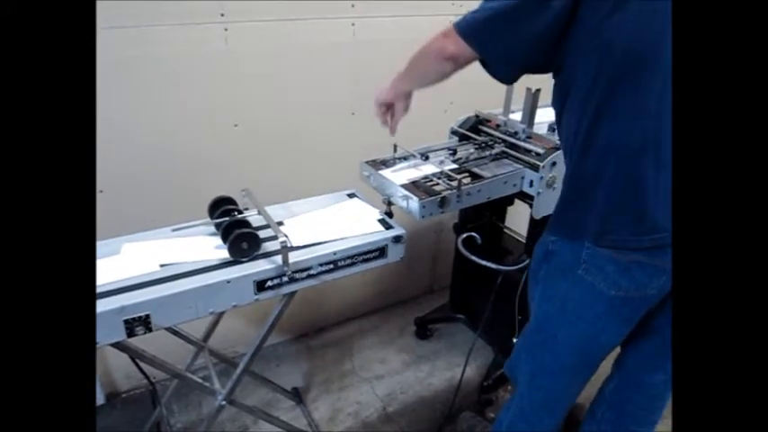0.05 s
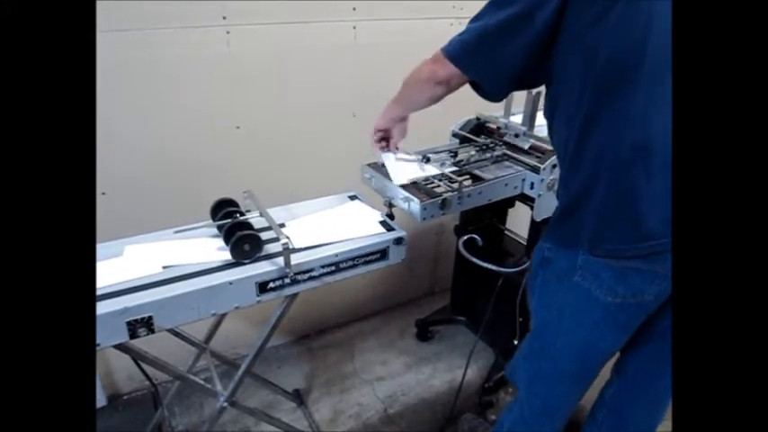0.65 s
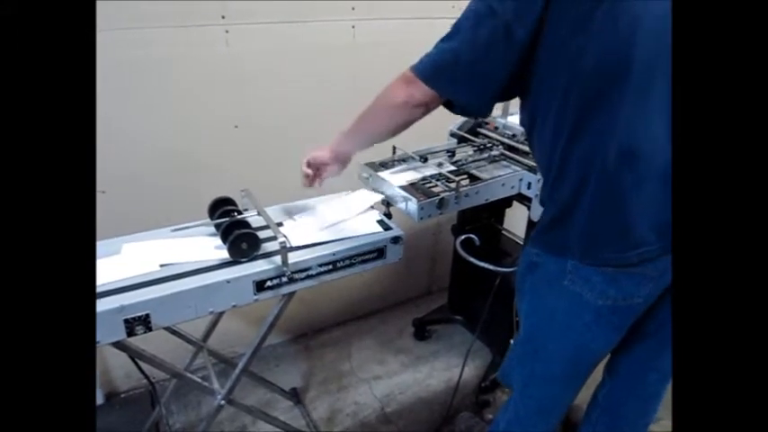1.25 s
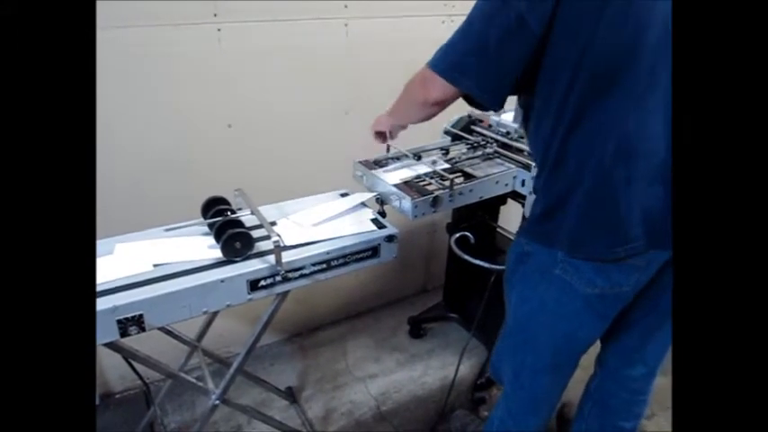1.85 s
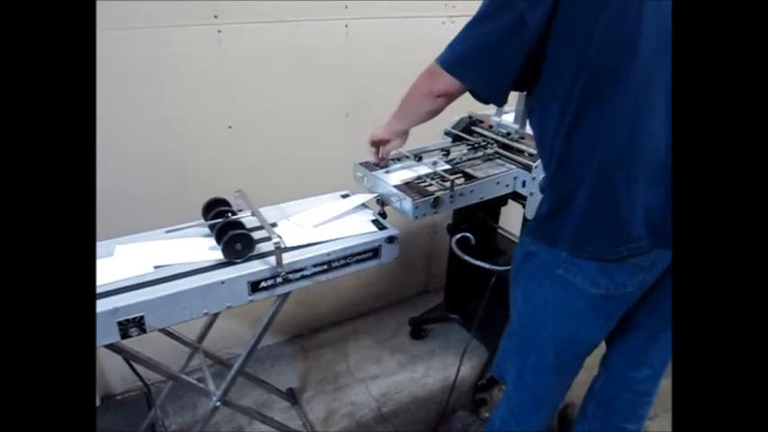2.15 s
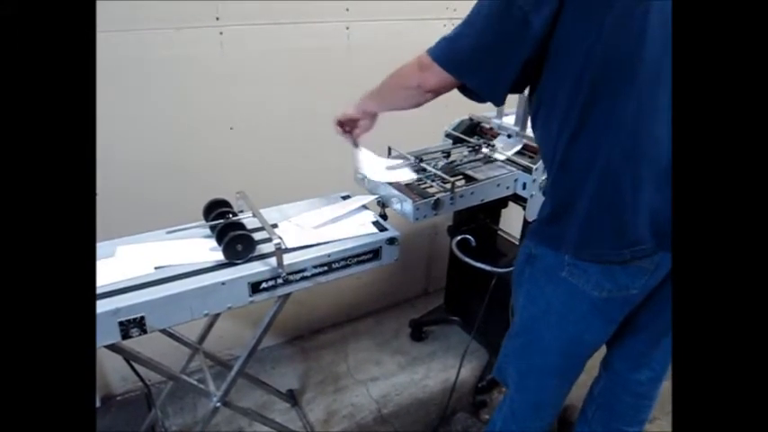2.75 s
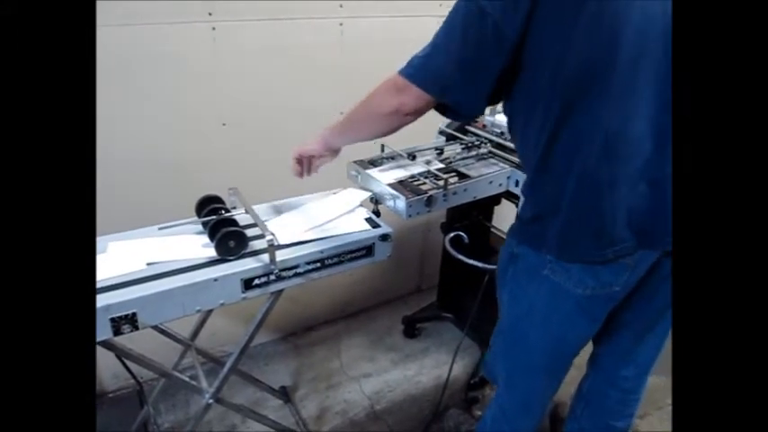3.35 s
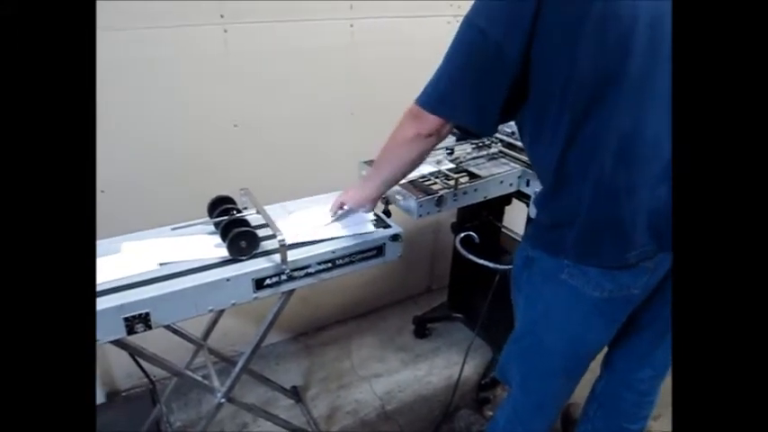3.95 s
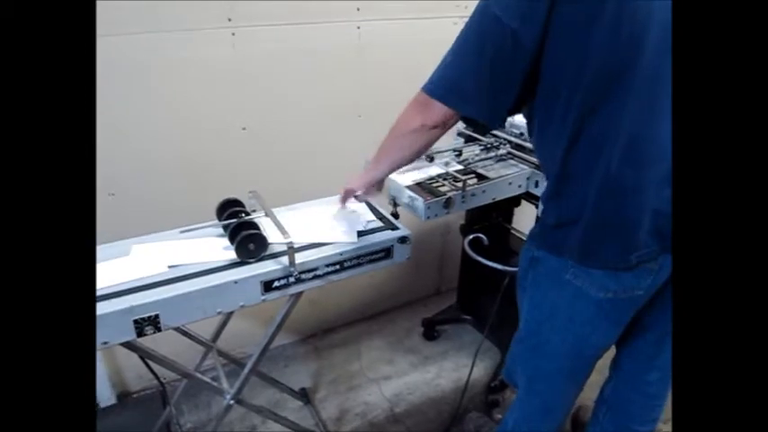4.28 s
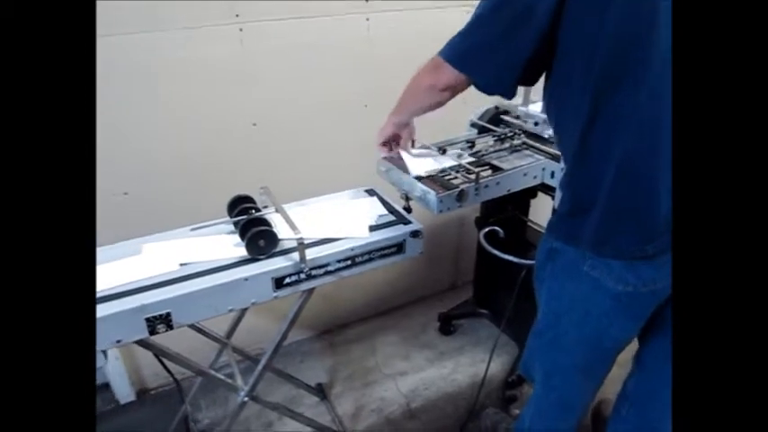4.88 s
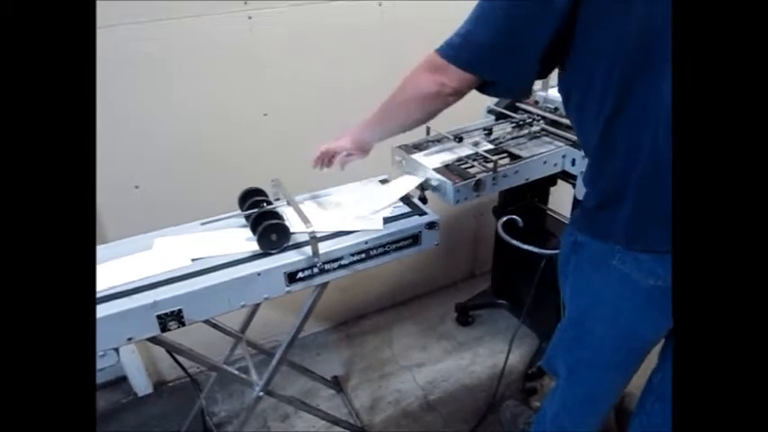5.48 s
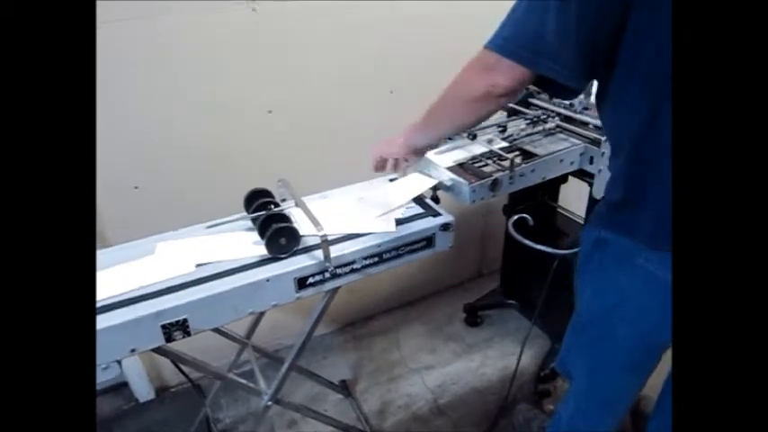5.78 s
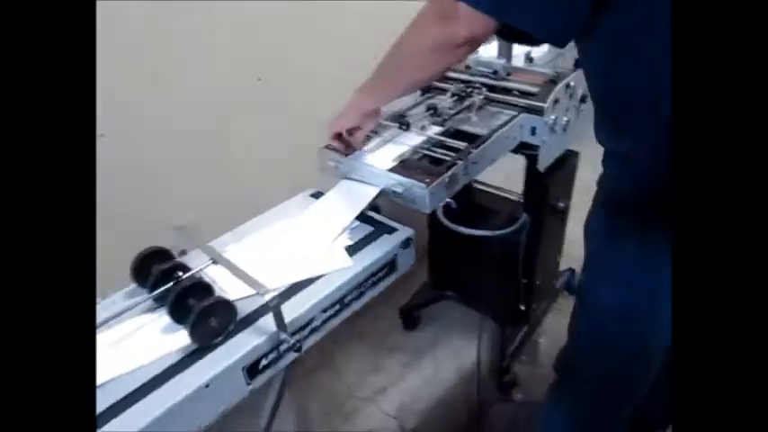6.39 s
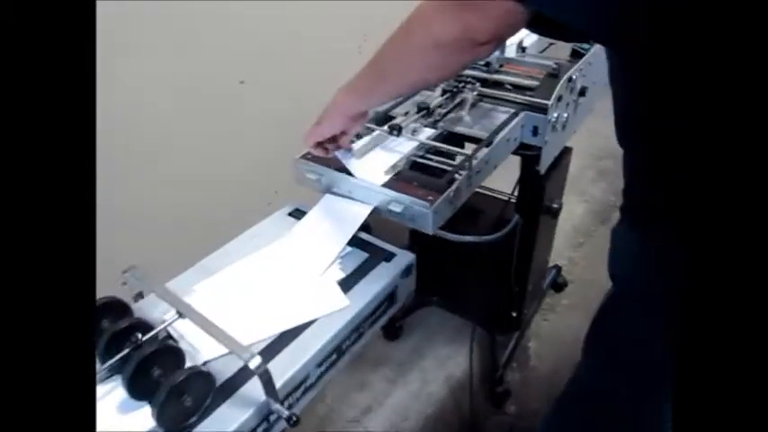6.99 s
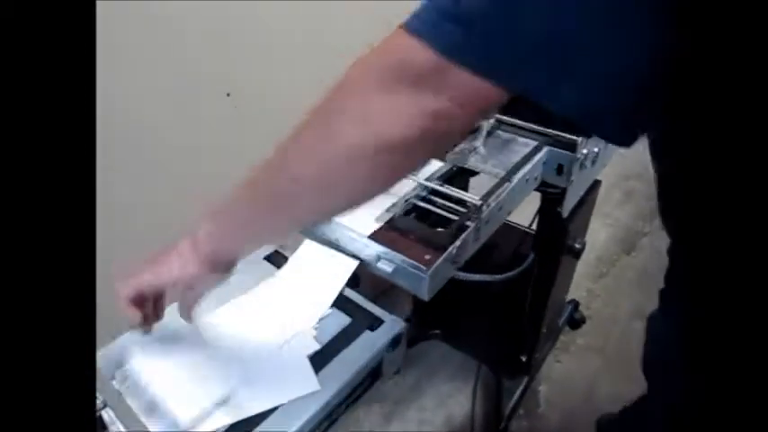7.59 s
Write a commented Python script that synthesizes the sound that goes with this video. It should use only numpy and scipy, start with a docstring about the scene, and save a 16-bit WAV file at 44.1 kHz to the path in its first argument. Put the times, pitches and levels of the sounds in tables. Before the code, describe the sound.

Four metallic clacks, each followed by crackling paper and a latch tick, cut through the loud hum and hiss of a feeder machine.

```python
"""An envelope feeder pulls four sheets, one by one, over the hum and hiss of its vacuum pump. On each feed a
clutch clacks, the rollers whirr, the sheet rustles, pops and lands, and a latch ticks shut. The warehouse adds
a thin tail. Late on, the microphone moves in. Its gain control ducks at every clack and creeps back, so the
steady hum seems to drop and swell."""
import sys
import numpy as np
from scipy import signal
from scipy.fft import rfft, irfft, next_fast_len
from scipy.io import wavfile
from scipy.ndimage import minimum_filter1d

SR = 44100
rng = np.random.default_rng(int(sys.argv[2]) if len(sys.argv) > 2 else 0)


def log_audio(samples):
    """Write samples as a 16-bit WAV file to the path given in sys.argv[1]."""
    # one column per channel
    frames = np.atleast_2d(samples).T
    # limit to full scale, then quantise
    limited = np.clip(frames, -1, 1)
    pcm = np.round(limited * 32767).astype(np.int16)
    wavfile.write(sys.argv[1], SR, pcm)


N = 340893
T = np.arange(N) / SR
FFT_SIZE = next_fast_len(N + 8192, True)
HZ = np.fft.rfftfreq(FFT_SIZE, 1 / SR)
MAINS_HZ, SHAFT_HZ = 60, 28.993

# one clutch clack a sheet (time [s], level [dB], second strike's delay [s], its relative level [dB],
# sheet rub level [dB], roller whirr level [dB])
FEEDS = [(0.6084, 8.5, 0.003, -5, 0.5, -22.5), (2.5988, 10.5, 0.0019, -1.5, -.5, -23),
         (4.9071, 7, 0.0026, -3, -.5, -24), (7.0764, 4, 0.0046, -4, -1.5, -42)]
# ring of the clutch metal (frequency [Hz], width [Hz], boost at full ring [dB])
METAL_MODES = [(1854, 110, 22), (3340, 150, 9), (3820, 100, 17), (4690, 40, 22), (5370, 430, 16),
               (7200, 140, 14), (10600, 350, 13)]
# body of the clutch metal (frequency [Hz], level [dB])
METAL_EQ = [(100, -22), (900, -4.5), (1700, -3), (3200, 2.5), (5500, -2), (7500, -3.5), (10500, -4),
            (15500, -6.5)]
# sheet stop and latch at the end of each feed (time [s], level [dB])
LATCH_TICKS = [(1.167, 2), (1.248, -7), (3.163, 1), (3.234, -5), (5.4625, 0.5), (5.5314, -4.5), (7.637, 0),
               (7.7055, -3.5)]
# swells as a sheet peels off, bends into the rollers, slips out and settles on the conveyor
# (time after the clack [s], rise [s], fall [s], flutter level [dB], rustle level [dB])
SHEET_SWELLS = [(0.135, 0.065, 0.064, -24, -6), (0.21, .03, 0.034, -11.5, -16),
                (0.517, 0.026, 0.04, -22, -7.5), (0.559, 0.037, 0.12, -11.5, -17)]
# the sheet buckles as it leaves the stack (time [s], pop level [dB], crack level [dB])
BUCKLES = [(0.7788, -11.5, -6), (0.802, -11, -3), (2.7135, -24, -7), (2.7747, -8, -4.5), (5.0826, -7, -0.5),
           (5.1049, -15, -4.5), (7.1837, -15, -7.5), (7.247, -6.5, -2), (7.282, -9, -11)]
# its tail slaps down twice (time after the clack [s], level [dB])
TAIL_SLAPS = [(0.503, -5.5), (0.538, -3.5)]
# paper colours: low flutter, bright rustle, hollow pop, sharp crack (frequency [Hz], level [dB])
FLUTTER_EQ = [(50, -36), (170, -3.5), (250, 5.5), (370, -1.5), (600, 1.5), (1000, -0.5), (1700, -4.5),
              (2600, -2.5), (5000, -29)]
RUSTLE_EQ = [(600, -15), (1500, -5.5), (2200, -2), (3100, 3), (4500, -1.5), (6300, -2), (7500, -9.5),
             (10500, -8), (15500, -18.5)]
POP_EQ = [(100, -14), (300, -10), (600, 7), (850, -8), (1300, -6), (4000, -32)]
CRACK_EQ = [(300, -12), (1100, 2.5), (2200, 6), (3300, 5), (5500, -8), (10000, -22), (15500, -24)]
# the sheet's edge on the stack (time [s], length [s], centre [Hz], width [Hz], level [dB])
EDGE_SCRAPES = [(0.763, 0.092, 11000, 2960, -12.5), (2.705, 0.032, 5800, 2200, -9),
                (4.995, 0.036, 5800, 2500, -17), (5.097, 0.047, 11200, 1600, -20),
                (7.17, 0.053, 5500, 2600, -8), (7.57, .08, 11000, 4000, -16)]
# envelope of the roller squeak (time [s], gain [0-1])
SQUEAK_ENVELOPE = [(5.285, 0), (5.305, 1), (5.335, 1), (5.355, 0)]
# motor hum (harmonic [x mains], level [dB])
HUM_PARTIALS = [(1, -49.6), (2, -22.0), (4, -28.5), (6, -28.9), (7, -43.7), (8, -38.1), (10, -46.6)]
# beat of the four pump vanes (harmonic [x shaft speed], level [dB])
VANE_PARTIALS = [(2, -47.4), (4, -36.3), (8, -37.0), (12, -31.9), (15, -50.0), (16, -40.8), (20, -43.7),
                 (24, -40.2)]
# rotor whine (harmonic [x shaft speed], level [dB], left minus right [dB])
WHINE_PARTIALS = [(66, -12, -1), (72, -13, 1), (77, -8, -5), (80, -11, -6), (81, 0, -3), (82, -8, -2),
                  (84, -13, 0), (93, -10, 1), (97, -10, -4), (98, -13, -1), (100, -15, 6), (101, -13, 0),
                  (117, -14, 5), (200, -8, 6), (208, -14, 4), (210, -11, 2)]
# colour of the exhaust air (frequency [Hz], side level [dB], close level [dB])
AIR_EQ = [(25, -12, -15), (59, -2.5, 1), (130, -1.5, -2.5), (259, 2.2, 3), (555, -0.8, -4), (820, 1.6, 3),
          (1390, -5.5, -6), (2010, -0.5, 1.5), (3470, -4.5, -3.5), (5970, 0, 2.5), (8400, -7.5, -6.5),
          (9750, 2.5, 2), (12850, -3, -5.5), (16400, -14.5, -14)]
# air line resonances (frequency [Hz], width [Hz], side boost [dB], close boost [dB])
HOSE_MODES = [(58, 6, 9, 11), (2350, 90, 4, 8), (2905, 90, 6, 6), (5790, 60, 6, 0), (6130, 130, 3, 6),
              (9850, 120, 3, 3), (10125, 70, 4, 5), (10637, 14, 12, 2), (11550, 130, 8, 2)]
# thin whistles close to the pump (frequency [Hz], level [dB])
PUMP_WHISTLES = [(1884, -42), (2466, -40), (2492, -42), (2902, -36), (2928, -38), (6122, -38), (10126, -41)]
# drone of the conveyor drive (frequency [Hz], level [dB])
CONVEYOR_PARTIALS = [(177.3, -45), (265.6, -45), (436.5, -47), (506, -48), (852, -45)]
# the microphone moves from the pump's side to close in front (time [s], close share [0-1])
APPROACH = [(5.6, 0.18), (6.3, 0.7)]
# last, it leans over the feeder, away from the motor (time [s], share of the way [0-1])
LEAN_IN = [(6.4, 0.44), (7, 1)]
# it leaves the beam of the pipe note (time [s], level [dB])
PIPE_FADE = [(5.95, 0), (6.2, -10.5)]
# the hiss rises and falls as it moves (time [s], level [dB])
HISS_RIDE = [(4.7, -1), (5.3, -2.3), (5.9, -0.1), (6.7, 1.5), (7.4, -3)]
# likeness of the two microphone ports (frequency [Hz], coherence [0-1])
PORT_COHERENCE = [(40, .95), (130, .985), (290, .975), (640, .93), (1410, .78), (3100, .64), (6820, .48),
                  (15000, .36)]
# phase between the ports (frequency [Hz], left lead [rad])
PORT_PHASE = [(0, -0.045), (1700, -0.21), (4400, 0.1), (6800, -0.78), (10000, -0.91), (15000, -0.55)]
# balance between the ports (frequency [Hz], left minus right [dB])
PORT_BALANCE = [(300, 0), (700, 1), (1300, 0), (2400, -2.5), (3400, 0), (6000, 3), (7400, .5), (9800, -3.5),
                (11600, -3), (12500, 1), (15000, -1)]


def clutch(clack_t60=0.044, tick_t60=0.043, clack_ring=0.51, tick_ring=0.22, rebound_s=0.048):
    """A hard double strike starts each feed; latch and stop tick in the same metal, drier and duller."""
    strikes = []
    for time, db, delay, second_db, *_ in FEEDS:
        strikes += [(time, db), (time + delay, db + second_db)]
    body, ring = spectrum(METAL_EQ), resonances(METAL_MODES)
    clacks = colour(bursts(strikes, clack_t60), body + clack_ring * ring)
    tick_eq = body + tick_ring * ring
    treble_octaves = np.log2(np.maximum(HZ / 3000, 1))  # light blows lose their top end
    ticks = colour(bursts(LATCH_TICKS, tick_t60), tick_eq - treble_octaves)
    latch_drops = [(time + rebound_s, -3.5) for time, *_ in FEEDS]
    rebounds = colour(bursts(latch_drops, tick_t60), tick_eq - 6 * treble_octaves)
    return clacks + ticks + rebounds


def paper(grain_db=2.0, rustle_db=-1):
    """The sheet rubs in uneven slips, pops as it bends and slaps softly as it lands."""
    slips = unit(amp(grain_db * drift(310)))
    flutter_envelope, rustle_envelope = sheet_drag()
    flutter = colour(noise() * slips * flutter_envelope, spectrum(FLUTTER_EQ))
    rustle = colour(noise() * slips * amp(rustle_db) * rustle_envelope, spectrum(RUSTLE_EQ))
    pops = bursts([(time, db) for time, db, _ in BUCKLES], t60=0.056, snap=13.8)
    cracks = bursts([(time, db) for time, _, db in BUCKLES], t60=0.093, snap=3.0)
    slaps = bursts([(time + after, db) for time, *_ in FEEDS for after, db in TAIL_SLAPS], t60=0.088)
    return flutter + rustle + colour(pops, spectrum(POP_EQ)) + colour(cracks + slips * slaps, spectrum(CRACK_EQ))


def sheet_drag(flutter_bed_db=-21, rustle_bed_db=-17):
    """Flutter and rustle envelopes: a steady rub through each feed, with four swells on top."""
    drags = feed_envelopes(start=0.005, rise=0.025, stop=0.94, fall=0.44)
    power = np.zeros((2, N))
    for (clack, *_, sheet_db, _), drag in zip(FEEDS, drags):
        moving = drag > 0
        rub = amp([[flutter_bed_db], [rustle_bed_db]]) ** 2
        for after, rise, fall, flutter_db, rustle_db in SHEET_SWELLS:
            t = T[moving] - clack - after
            swell = np.exp(np.minimum(t / rise, -t / fall))
            rub = rub + (amp([[flutter_db], [rustle_db]]) * swell) ** 2
        power[:, moving] += rub * (drag[moving] * amp([[0], [sheet_db]])) ** 2
    return np.sqrt(power)


def scrapes():
    """Short, bright rasps of paper sliding on paper."""
    out = np.zeros((2, N))
    for time, length, hz, width, db in EDGE_SCRAPES:
        start, count = int(time * SR), int(length * SR)
        band = signal.butter(2, [hz - width / 2, hz + width / 2], "bandpass", fs=SR, output="sos")
        rasp = signal.sosfilt(band, rng.standard_normal(count) + rng.standard_normal((2, count)))
        out[:, start:start + count] += amp(db) * unit(rasp) * signal.windows.tukey(count, 0.5)
    return out


def rollers(whirr_hz=3000, half_width_hz=85, squeak_hz=6420, squeak_db=-23):
    """The turning rollers sing in one narrow band, and squeak once."""
    band_db = -20 * np.log10(1 + ((HZ - whirr_hz) / half_width_hz) ** 2)
    envelope = amp([whirr_db for *_, whirr_db in FEEDS]) @ turning()
    whirr = colour(noise() * envelope, band_db)
    squeak = curve(SQUEAK_ENVELOPE) * tone(squeak_hz * T + 0.21 * drift(74))
    return whirr + amp(squeak_db) * squeak


def pump_hum(shaft, buzz_above_hz=300):
    """Mains hum and vane pulses lie a few Hz apart and throb together; venting softens both."""
    close, lean, vent = curve(APPROACH), curve(LEAN_IN), venting()
    buzz_db = 1 - 4 * vent + 3.5 * close - 5 * lean  # the upper partials move most
    hum, vanes = 0, 0
    for k, db in HUM_PARTIALS:
        lift_db = 2 * close * (k == 4) + buzz_db * (k * MAINS_HZ > buzz_above_hz)
        hum += amp(db + lift_db) * tone(k * MAINS_HZ * T)
    for k, db in VANE_PARTIALS:
        lift_db = 4 * close * (k == 24) + buzz_db * (k * SHAFT_HZ > buzz_above_hz)
        vanes += amp(db + lift_db) * tone(k * shaft)
    return amp(-1.5 * vent - 2 * lean) * (amp(0.7) * hum + amp(2 * close) * vanes)


def pipe_note(shaft, level_db=-20.6, vent_db=-10):
    """One pump harmonic sings in the pipe, wavering as the microphone crosses its standing waves."""
    dip_db = np.minimum(vent_db * venting(), curve(PIPE_FADE))
    note = amp(level_db + dip_db) * tone(28 * shaft)
    waver_depth = 0.12 + 0.4 * curve(APPROACH) ** 2
    return note * (1 + waver_depth * drift(8.2)) * pan(1)


def rotor_whine(shaft, level_db=-34, vent_db=-2, lean_db=3):
    """High shaft harmonics shimmer above the hum, spread across the stereo field."""
    wavers = [1 + 0.2 * drift(6) for _ in range(4)]
    whine = sum(amp(db) * pan(balance_db) * tone(k * shaft) * wavers[i % 4]
                for i, (k, db, balance_db) in enumerate(WHINE_PARTIALS))
    return amp(level_db + vent_db * venting() + lean_db * curve(LEAN_IN)) * whine


def exhaust(shaft, level_db=-17.5, flicker_db=0.5, vent_db=-0.5):
    """Air hisses through the lines, puffing slightly with each vane; its colour shifts close up."""
    puffs = 1 + 0.035 * tone(4 * shaft)
    jet = noise() * puffs * amp(flicker_db * drift(40))
    ripple_db = 1.6 * drift(60)[:len(HZ)] * np.clip(HZ / 3000, 0, 1)  # standing waves in the hoses
    side = colour(jet, spectrum(AIR_EQ) + ripple_db + resonances(HOSE_MODES))
    front = colour(jet, spectrum(AIR_EQ, column=2) + ripple_db + resonances(HOSE_MODES, column=3))
    close = curve(APPROACH)
    return amp(level_db + vent_db * venting() + curve(HISS_RIDE)) * ((1 - close) * side + close * front)


def conveyor_and_whistles():
    """The conveyor drive drones throughout; thin whistles come up as the microphone nears the pump."""
    sway = 0.12 * drift(10)
    drone = sum(amp(db) * tone(hz * T + sway) for hz, db in CONVEYOR_PARTIALS)
    whistles = [sum(amp(db) * tone(hz * T + 2 * sway) for hz, db in PUMP_WHISTLES) for _ in range(2)]
    return drone + curve(APPROACH) * np.array(whistles)


def warehouse(x, t60=0.74, predelay_s=0.014):
    """A thin, diffuse tail from the far walls."""
    t = T[:SR // 2]
    tail = rng.standard_normal((2, len(t))) * amp(-60 * t / t60) * (t > predelay_s)
    return signal.fftconvolve(x, tail / np.linalg.norm(tail[0]), axes=1)[:, :N]


def feed_envelopes(start, rise, stop, fall):
    """One 0-1 attack, hold and release a sheet, timed in seconds from its clack."""
    since_clack = np.array([T - time for time, *_ in FEEDS])
    return np.clip(np.minimum((since_clack - start) / rise, (stop - since_clack) / fall), 0, 1)


def turning():
    """One envelope a sheet: 1 while the rollers are up to speed."""
    return feed_envelopes(start=0.08, rise=0.05, stop=0.66, fall=0.05)


def venting():
    """0 while the pump holds its suction, 1 while a feed vents it."""
    return feed_envelopes(start=0.093, rise=0.25, stop=0.8, fall=0.24).sum(0)


def amp(db):
    """Decibels to gain."""
    return 10 ** (np.asarray(db) / 20)


def pan(balance_db):
    """Left and right gains, balance_db apart."""
    return amp(np.outer([0.5, -0.5], balance_db))


def unit(x):
    """Scale to rms 1."""
    return x / np.sqrt(np.mean(x ** 2) + 1e-20)


def tone(turns):
    """A sine of rms 1 with a random starting phase."""
    return np.sqrt(2) * np.sin(2 * np.pi * (turns + rng.random()))


def curve(rows):
    """An automation curve through (time, value) points."""
    return np.interp(T, *np.transpose(rows))


def spectrum(rows, column=1):
    """One column of a table along log frequency."""
    rows = np.asarray(rows)
    return np.interp(np.log(HZ + 1), np.log(rows[:, 0] + 1), rows[:, column])


def resonances(modes, column=2):
    """Resonant EQ peaks in dB, with the boost taken from the given column."""
    return sum(mode[column] / (1 + (2 * (HZ - mode[0]) / mode[1]) ** 2) for mode in modes)


def drift(rate):
    """Smooth random modulation of rms 1, changing about rate times a second."""
    knots = rng.standard_normal(int(3 * rate * T[-1]) + 2)
    smooth = signal.resample(knots, 8 * len(knots))
    return unit(np.interp(T, np.linspace(0, T[-1], len(smooth)), smooth))


def noise():
    """White noise as the two microphone ports pick it up."""
    left, other = rfft(rng.standard_normal((2, FFT_SIZE)))
    shared = spectrum(PORT_COHERENCE)
    right = (shared * left + np.sqrt(1 - shared ** 2) * other) * np.exp(-1j * spectrum(PORT_PHASE))
    return irfft(np.array([left, right]) * pan(spectrum(PORT_BALANCE)), FFT_SIZE)[:, :N]


def colour(x, eq_db):
    """Minimum-phase EQ; white noise keeps its power."""
    cepstrum = irfft(np.log(unit(amp(eq_db))), FFT_SIZE)
    cepstrum[1:FFT_SIZE // 2] *= 2
    cepstrum[FFT_SIZE // 2 + 1:] = 0
    return irfft(rfft(x, FFT_SIZE) * np.exp(rfft(cepstrum)), FFT_SIZE)[..., :N]


def bursts(hits, t60, snap=0):
    """Decaying noise at each (time [s], level [dB]); snap adds a sharp transient."""
    power = np.zeros(N)
    for time, db in hits:
        power[int(time * SR)] += amp(db) ** 2
    decay = amp(-120 / (t60 * SR))
    return noise() * np.sqrt(signal.lfilter([1], [1, -decay], power)) + snap * np.sqrt(power)


def scene(wet_db=-18):
    """The feed action and its warehouse tail over a bed of pump hum, whine and hiss."""
    speed_hz = SHAFT_HZ + 0.33 * turning().sum(0) + 0.012 * drift(3)  # vented, the pump runs faster
    shaft = np.cumsum(speed_hz) / SR  # in turns
    action = clutch() + paper() + scrapes() + rollers()
    pump = pump_hum(shaft) + pipe_note(shaft) + rotor_whine(shaft) + exhaust(shaft)
    return action + pump + amp(wet_db) * warehouse(action)


def gain_control(x, limit_db=-11.0, attack_s=0.0015, hold_s=0.094, recovery_s=0.84, start_duck_db=5.5):
    """Whatever passes the limit ducks the gain at once; it holds, then creeps back."""
    pole = np.exp(-1 / (attack_s * SR))
    power = signal.lfilter([1 - pole], [1, -pole], (x ** 2).mean(0))
    over_db = np.maximum(10 * np.log10(power + 1e-12) - limit_db, 0)
    span = int(hold_s * SR) | 1
    held_db = -minimum_filter1d(-over_db, span, origin=span // 2, mode="constant")
    release = np.exp(-T / recovery_s)
    duck_db = np.maximum(np.maximum.accumulate(held_db / release), start_duck_db) * release
    return x / amp(duck_db)


def record(dry, notch_hz=8230, notch_width_hz=200, cutoff_hz=15780):
    """Gain control, full-scale clipping, a treble notch and a steep high cut."""
    clipped = np.clip(gain_control(dry), -1, 1)
    offset_squared = (HZ - notch_hz) ** 2
    notch = (offset_squared / (offset_squared + notch_width_hz ** 2)) ** 2
    high_cut = 1 / (1 + (HZ / cutoff_hz) ** 400)
    return irfft(rfft(clipped, FFT_SIZE) * notch * high_cut, FFT_SIZE)[:, :N]


dry = scene()
out = record(dry)
log_audio(out)
```